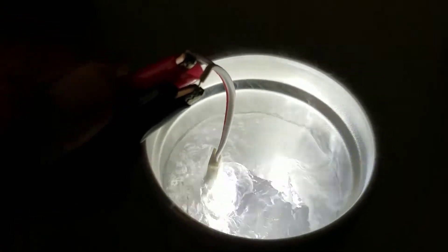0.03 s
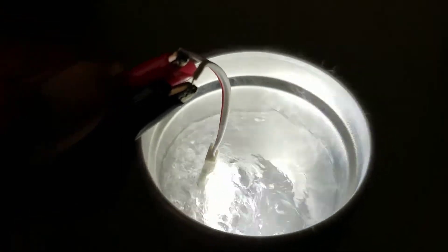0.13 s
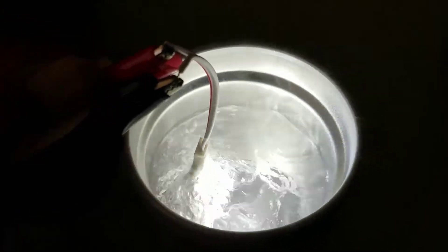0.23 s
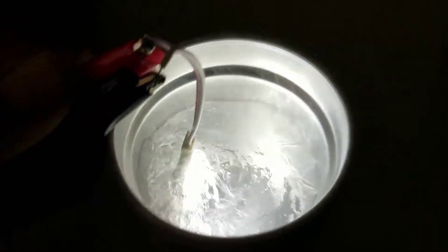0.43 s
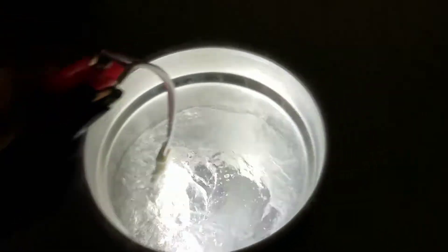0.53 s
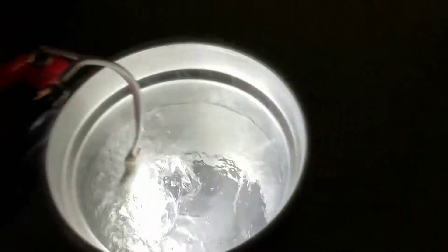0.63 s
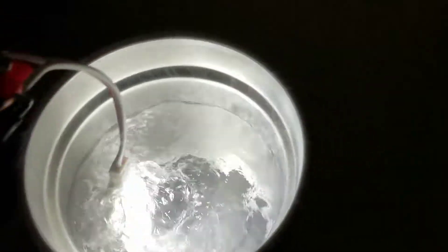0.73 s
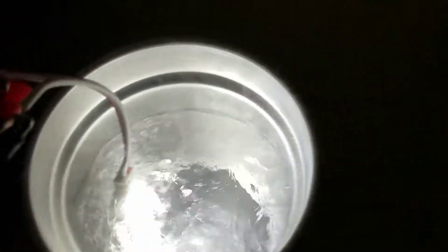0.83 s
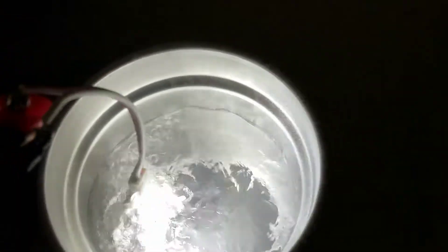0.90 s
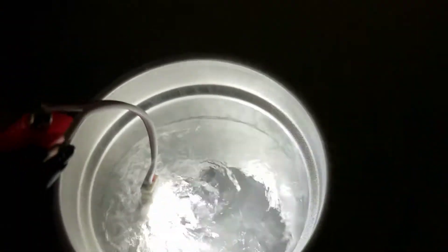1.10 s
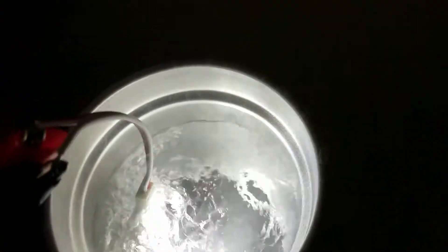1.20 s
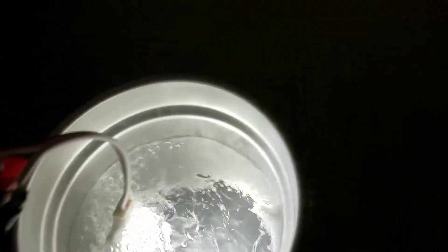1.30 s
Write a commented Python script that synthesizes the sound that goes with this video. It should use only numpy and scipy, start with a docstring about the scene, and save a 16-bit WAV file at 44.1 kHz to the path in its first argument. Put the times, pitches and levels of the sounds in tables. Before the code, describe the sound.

Boiling liquid hisses and churns in a metal cup, heard close up in a small room. A single loud, sharp knock cuts in with a short echo, and the boil later grows stronger, with steam spits and bursting bubbles.

```python
"""Electrode boiling in a metal cup

Liquid boils violently round a live electrode, close to a pair of microphones in a small room.
Tiny bubbles collapse in a hiss and a fizz, bigger ones ring the cup's hollow, and the liquid churns.
Early on one sharp knock, probably gas popping at the electrode, rings the cup and the room.
Steam spits now and then, and near the end the boil swells and glugs."""
import sys
import numpy as np
from scipy import signal
from scipy.fft import rfft, irfft, next_fast_len
from scipy.io import wavfile
from scipy.ndimage import map_coordinates

SR = 44100
rng = np.random.default_rng(int(sys.argv[2]) if len(sys.argv) > 2 else 0)


def output_pcm(signal):
    """Save a mono or channel-first signal as 16-bit PCM at the path in sys.argv[1].

    Samples are clipped to [-1, 1] before scaling.
    """
    pcm = np.clip(np.atleast_2d(signal).T, -1, 1) * 32767
    wavfile.write(sys.argv[1], SR, np.round(pcm).astype(np.int16))


N = 59535

# course of the boil, before each layer's trim: time_s, churn_db, bubble_db, hiss_db, fizz_db
BOIL_LEVELS = [(0, -60, -61.5, -49.5, -57), (0.1, -61.5, -56, -55.5, -60.0),
               (0.19, -59, -53.5, -51.5, -56.5), (0.41, -60, -57, -52, -56.5),
               (0.5, -63.5, -61.5, -56.0, -58), (0.591, -64.5, -57.5, -54.5, -53.5),
               (0.63, -64, -60.0, -56.5, -61), (0.67, -65, -60, -56.5, -55), (0.74, -63.5, -59, -56.5, -62),
               (0.821, -63.0, -61, -55.5, -55), (0.862, -53, -60.5, -53.5, -58.5),
               (0.92, -58.5, -58.5, -52, -50), (0.981, -55, -56, -49.5, -53),
               (1.01, -55.5, -49.0, -49, -45.5), (1.051, -56.0, -52, -45, -38.5),
               (1.079, -52, -50.0, -46, -48.5), (1.16, -54.5, -52.5, -43.5, -47.0),
               (1.2, -52.5, -45, -44.5, -46), (1.285, -51.5, -46.5, -42.0, -41.5),
               (1.34, -52, -53, -43.0, -44)]
# tone of the churning, the hiss and the fizz: freq_hz, relative_db
CHURN_SPECTRUM = [(25, -7), (55, -5), (110, -5), (300, -7), (480, 0.5), (650, -4.5), (900, -2.5),
                  (1500, -1.5), (2500, -30.5)]
HISS_SPECTRUM = [(900, -39), (1800, -5.5), (2200, -4.5), (2650, -5), (3300, -6.5), (4200, -5), (5200, -5),
                 (6200, 0.5), (6700, -3), (7200, -1), (8100, -3), (9200, -16.5), (12000, -12.5)]
FIZZ_SPECTRUM = [(6000, -36), (8500, -13), (10500, -10), (11800, -9), (13200, -2), (14000, -1.5),
                 (15700, -2)]
# resonances of the low slosh, the cup's hollow and the higher gurgle: pitch_hz, width_hz, relative_db
SLOSH_MODES = [(107.3, 27, -5.5), (188.3, 20.7, -3), (271.4, 34, -0.5), (449, 78, -6)]
HOLLOW_MODES = [(1050, 78, -0.5), (1136.4, 52, 1), (1313, 80, -5), (1980, 220, -16)]
GURGLE_MODES = [(2410, 230, -3), (2642, 196, 0)]
# balance of the boil at the microphones: freq_hz, left_minus_right_db
MIC_BALANCE = [(100, -1.5), (1100, 0), (2200, -1), (3300, -3.5), (4200, -6), (5300, -14.5), (6600, -16.5),
               (8100, -7.5), (9500, -4), (11800, -2), (13600, -11.5), (15600, -5)]
# how alike the two microphones hear it: freq_hz, correlation
MIC_LIKENESS = [(100, 0.87), (1100, 0.98), (2000, 0.21), (3500, 0.36), (6000, 0.1), (15000, 0.11)]
# the two bursts of the knock's crack: delay_s, relative_db
CRACK_BURSTS = [(0, 3.5), (.0017, -9.5)]
# tone of the crack: freq_hz, relative_db
CRACK_SPECTRUM = [(60, -18), (200, -9), (420, -8.5), (700, -6), (1050, 3), (1500, 2), (2000, -5), (2750, 2),
                  (3500, 2), (5200, -3), (6200, 0), (8000, 2), (10000, -11.5), (12000, -0.5), (14700, 5),
                  (16000, 0.5)]
# the cup's short answer to the knock: pitch_hz, width_hz, relative_db
CLACK_MODES = [(380, 257, -3), (1070, 210, 1), (1577, 136, -4.5), (2773, 320, -1), (6180, 420, -5)]
# what the knock leaves ringing: pitch_hz, relative_db, t60_s
RING_MODES = [(194.8, -40.5, 0.46), (265, -46, 0.29), (352, -41.5, 0.41), (993, -32, 0.13),
              (1233, -29, 0.23), (1493, -41, 0.28), (1811, -29.5, 0.18), (1841, -35.5, 0.293),
              (2660, -41, 0.14), (3486, -36, 0.23), (7100, -44, 0.38), (7800, -42, .2), (14625, -41, 0.138)]
# tone of the room's echo: freq_hz, relative_db
ECHO_SPECTRUM = [(40, 4), (140, -13), (300, 11), (750, 0.5), (1100, 3.5), (1500, 0.5), (1900, 4),
                 (3000, -3.5), (5500, -4), (7300, 6.5), (9800, -7.5), (12000, -2.5), (14800, 0.5),
                 (16000, 2)]
# decay of the room: freq_hz, t60_s
ROOM_DECAY = [(200, 0.19), (2000, 0.28), (7000, 0.22), (15000, 0.249)]
# spits of steam: start_s, relative_db
STEAM_SPITS = [(0.5369, -33.5), (0.958, -28.5), (1.006, -43), (1.0463, -33.5), (1.1022, -24.5),
               (1.1912, -26.5)]
# big bubbles bursting: start_s, relative_db
BIG_BUBBLES = [(0.995, -41), (1.138, -38), (1.18, -35.5), (1.2, -35), (1.223, -47), (1.247, -39),
               (1.283, -40), (1.309, -41)]

KNOCK_S, LEFT_LEAD_S = 0.2339, 0.00018
TIME_S = np.arange(N) / SR


def amp(db):
    """Decibels to gain."""
    return 10 ** (np.asarray(db) / 20)


def unit(x):
    """Scaled to rms 1."""
    return x / np.sqrt(np.mean(x ** 2) + 1e-20)


def along(points, hz):
    """A table's value at hz, read on a log frequency axis."""
    freqs, values = np.transpose(points)
    return np.interp(np.log(hz + 1), np.log(freqs + 1), values)


def wobble(rate):
    """A smooth random curve, rate knots a second."""
    return map_coordinates(rng.standard_normal(int(N * rate / SR) + 4), [TIME_S * rate])


def filtered(x, response):
    """x through a complex frequency response."""
    size = next_fast_len(N + SR // 2)
    return irfft(rfft(x, size) * response(np.fft.rfftfreq(size, 1 / SR)), size)[..., :N]


def coloured(x, spectrum):
    """x shaped by a spectrum, at rms 1."""
    return unit(filtered(x, lambda hz: amp(along(spectrum, hz))))


def resonate(x, modes):
    """x through parallel resonances of alternating polarity."""
    return filtered(x, lambda hz: sum(
        (-1) ** k * amp(db) * 1j * hz * width / (pitch ** 2 - hz ** 2 + 1j * hz * width)
        for k, (pitch, width, db) in enumerate(modes)))


def decay(start_s, t60_s, attack_s=0.0002):
    """A fast rise and an exponential fall."""
    age = np.maximum(TIME_S - start_s, 0)
    return (1 - np.exp(-age / attack_s)) * amp(-60 * age / t60_s)


def at_mics(pair):
    """Two unrelated signals become left and right: alike in the bass, the left earlier and duller."""
    def mid_side(hz):
        angle = np.arccos(along(MIC_LIKENESS, hz)) / 2
        return np.array([np.cos(angle), np.sin(angle)])

    def placement(hz):
        left = amp(along(MIC_BALANCE, hz))
        lead = np.exp(2j * np.pi * hz * LEFT_LEAD_S)
        return np.array([left * lead, np.ones(len(hz))]) / np.hypot(left, 1)

    mid, side = filtered(pair, mid_side)
    return filtered(np.array([mid + side, mid - side]), placement)


def pops(rate, spread_db, share):
    """Collapsing bubbles at the microphones: single pops take share of the power, a wash the rest."""
    hits = (rng.random((2, N)) < rate / SR) * rng.choice([-1, 1], (2, N))
    sizes = amp(spread_db * np.clip(rng.standard_normal((2, N)), -2, 2))
    wash = rng.standard_normal((2, N))
    return at_mics(np.sqrt(share) * unit(hits * sizes) + np.sqrt(1 - share) * wash)


def in_cup(x):
    """Quick reflections between the metal walls, different for each microphone."""
    reflections = rng.standard_normal((2, N)) * decay(0, t60_s=0.069)
    reflections /= np.linalg.norm(reflections, axis=1, keepdims=True)
    return x + amp(-5.5) * signal.fftconvolve(x, reflections, axes=1)[:, :N]


def churning(level_db):
    """The liquid churns and stirs low, sloshing resonances."""
    churn = coloured(pops(rate=300, spread_db=-0.5, share=0.39), CHURN_SPECTRUM)
    slosh = unit(resonate(pops(rate=270, spread_db=2.5, share=0.32), SLOSH_MODES))
    return amp(level_db - 1) * churn + amp(level_db - 4) * slosh


def bubbling(level_db):
    """Bigger bubbles keep the cup's hollow ringing."""
    bubbles = pops(rate=220, spread_db=3.5, share=0.58)
    return amp(level_db - 0.5) * unit(resonate(bubbles, HOLLOW_MODES))


def sizzle(hiss_db, fizz_db, sputter_db):
    """Tiny bubbles collapse inside the cup: a hiss, and a higher fizz that flickers faster."""
    hiss = coloured(in_cup(pops(rate=1200, spread_db=5, share=0.55)), HISS_SPECTRUM)
    flicker_db = sputter_db + 0.35 * wobble(111.3)
    fizz = coloured(in_cup(pops(rate=1500, spread_db=3.5, share=0.79)), FIZZ_SPECTRUM)
    return amp(hiss_db + 0.5 + 0.6 * sputter_db) * hiss + amp(fizz_db + 3.5 + flicker_db) * fizz


def gurgle(bubble_db):
    """Smaller bubbles ring a higher resonance, partly following the bubbling's swell."""
    level_db = -62.5 + 0.58 * (bubble_db - bubble_db.mean()) + 2 * wobble(24.7)
    bubbles = pops(rate=250, spread_db=3.5, share=0.6)
    return amp(level_db) * unit(resonate(bubbles, GURGLE_MODES))


def boil():
    """The running boil, close up; the treble sputters as the steam film collapses and re-forms."""
    times, *levels = np.transpose(BOIL_LEVELS)
    churn_db, bubble_db, hiss_db, fizz_db = [np.interp(TIME_S, times, db) for db in levels]
    sputter_db = 1.92 * wobble(45.2) + 0.87 * wobble(360)
    body = churning(churn_db) + bubbling(bubble_db)
    return body + sizzle(hiss_db, fizz_db, sputter_db) + gurgle(bubble_db)


def shaded(x, left_db):
    """The left microphone hears the knock weaker, with about half the dullness it gives the boil."""
    return filtered(x, lambda hz: np.array([amp(left_db + 0.54 * along(MIC_BALANCE, hz)),
                                            np.ones(len(hz))]))


def knock():
    """A pressure spike with suction behind it, a double crack and the cup's clack."""
    spike = amp(6.5) * decay(KNOCK_S, t60_s=0.00031, attack_s=0.00002)
    progress = np.maximum(TIME_S - KNOCK_S, 0) / 0.00041  # 1 at the deepest suction
    suction = amp(-7) * progress * np.exp(1 - progress)
    pressure = (spike - suction) * amp([[-22], [0]])  # nearly all on the right microphone
    bursts = sum(amp(db - 9.5) * decay(KNOCK_S + delay_s, t60_s=0.017, attack_s=0.0001)
                 for delay_s, db in CRACK_BURSTS)
    crack = bursts * coloured(rng.standard_normal((2, N)), CRACK_SPECTRUM)
    clack = amp(16.5) * resonate(signal.unit_impulse(N, round(KNOCK_S * SR)), CLACK_MODES)
    return pressure + shaded(crack + clack, left_db=-5)


def ringing():
    """The modes struck by the knock ring on, wavering slightly."""
    age = np.maximum(TIME_S - KNOCK_S, 0) + np.array([[LEFT_LEAD_S], [0]])
    ring = np.zeros((2, N))
    for hz, db, t60_s in RING_MODES:
        envelope = amp(db + rng.normal(0, 1, (2, 1))) * decay(KNOCK_S, t60_s, attack_s=0.0065)
        ring += envelope * np.sin(2 * np.pi * hz * age + 0.71 * wobble(50.3))
    return shaded(ring, left_db=-2)


def room_echo():
    """The near walls return the knock after a short gap; the midrange lasts longest."""
    start_s = KNOCK_S + 0.0092
    noise = coloured(rng.standard_normal((2, N)), ECHO_SPECTRUM)
    hz, frame_s, bands = signal.stft(noise, SR, nperseg=256)
    fall = amp(-60 * np.maximum(frame_s - start_s, 0) / along(ROOM_DECAY, hz)[:, None])
    tail = signal.istft(bands * fall, SR, nperseg=256)[1][:, :N]
    rise = np.clip((TIME_S - start_s) / 0.001, 0, 1)
    return amp(-24) * shaded(rise * tail, left_db=-2.5)


def spits():
    """Short spurts of steam on top of the hiss, each opened by a tick."""
    hiss = coloured(pops(rate=900, spread_db=4.5, share=0.85), HISS_SPECTRUM)
    fizz = coloured(at_mics(rng.standard_normal((2, N))), FIZZ_SPECTRUM)
    spurts = sum(amp(db - 12) * decay(start_s, t60_s=0.06) for start_s, db in STEAM_SPITS)
    ticks = sum(amp(db - 9) * decay(start_s, t60_s=0.0033) for start_s, db in STEAM_SPITS)
    return unit(hiss + fizz) * (spurts + ticks)


def glugs():
    """Each big bubble bursts and rings the hollow once."""
    bursts = np.zeros((2, N))
    for start_s, db in BIG_BUBBLES:
        bursts[0, round(start_s * SR)] = amp(db)
    ring = resonate(at_mics(bursts), HOLLOW_MODES)
    return amp(-3) * bursts.max() * ring / np.abs(ring).max()


def scene():
    """The boiling cup close to the microphones, the knock and its echo."""
    liquid = boil() + spits() + glugs()
    return liquid + knock() + ringing() + room_echo()


def record(dry):
    """The knock overloads the recorder, which thins the deep bass and cuts off the highest treble."""
    low_cut_hz, top_hz = 47, 15850
    clipped = np.clip(dry, -1, 1)
    thinned = filtered(clipped, lambda hz: 1j * hz / (low_cut_hz + 1j * hz))
    return filtered(thinned, lambda hz: 1 / (1 + (hz / top_hz) ** 200))


dry = scene()
out = record(dry)
output_pcm(out)
```